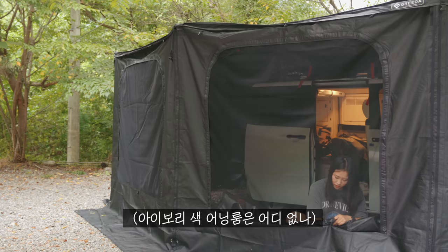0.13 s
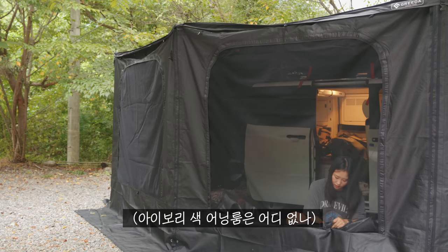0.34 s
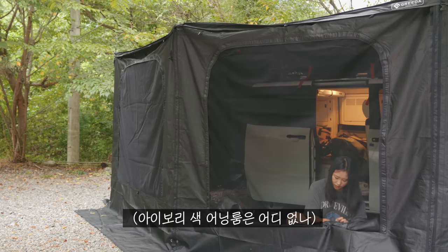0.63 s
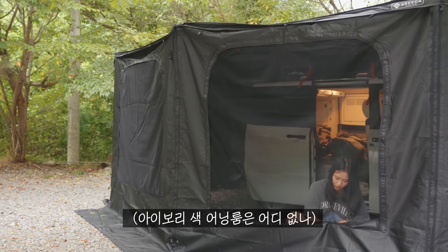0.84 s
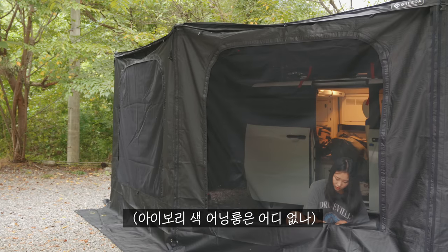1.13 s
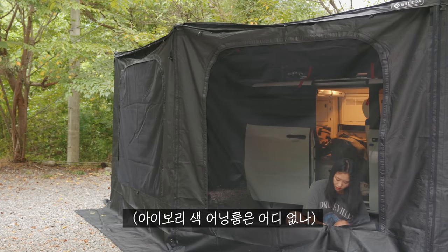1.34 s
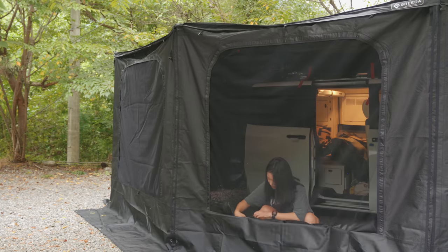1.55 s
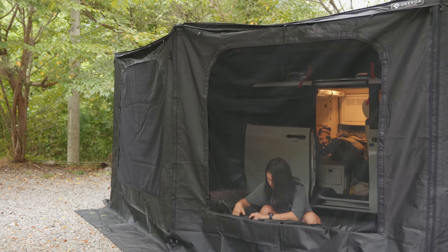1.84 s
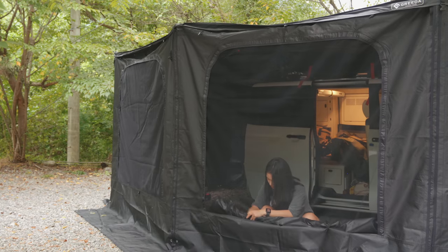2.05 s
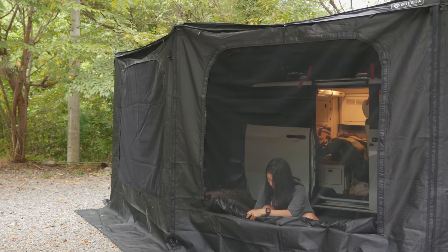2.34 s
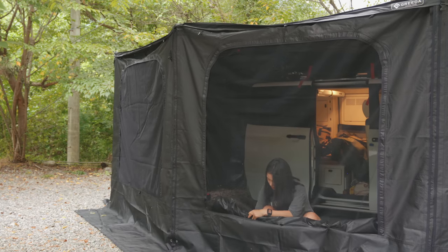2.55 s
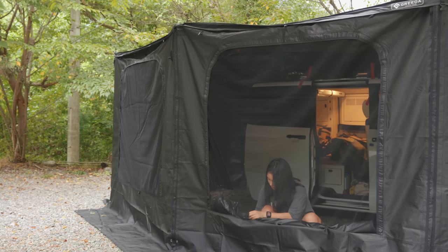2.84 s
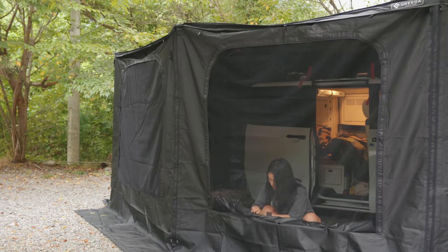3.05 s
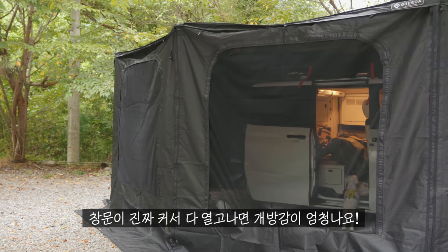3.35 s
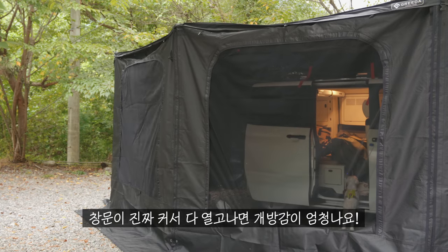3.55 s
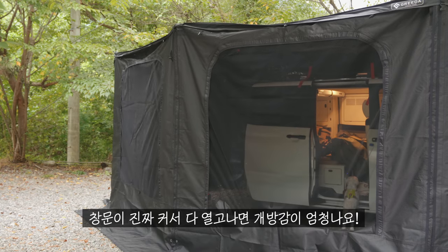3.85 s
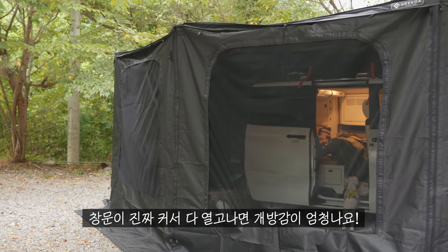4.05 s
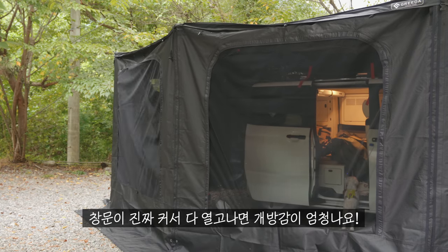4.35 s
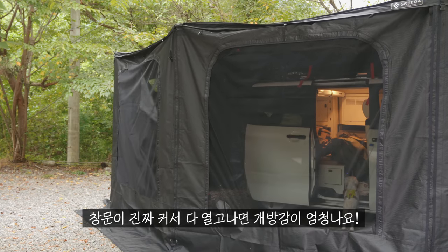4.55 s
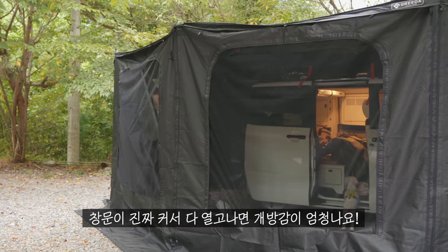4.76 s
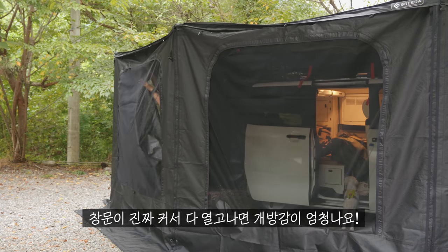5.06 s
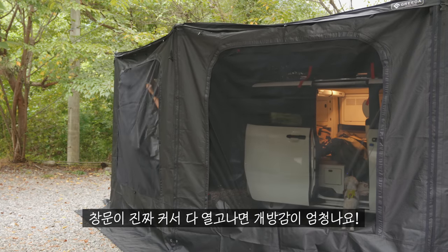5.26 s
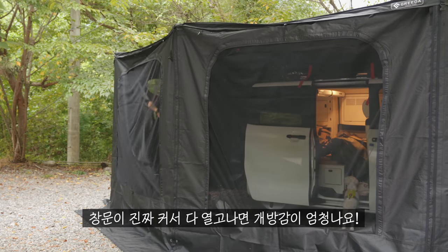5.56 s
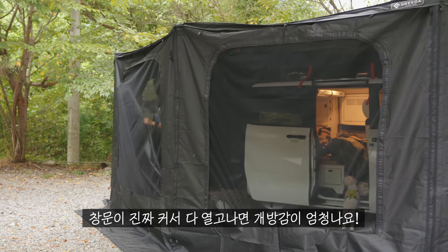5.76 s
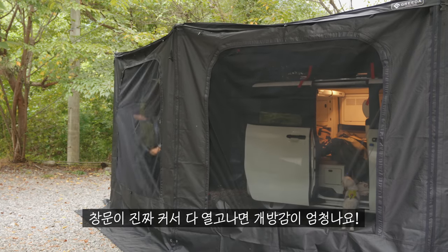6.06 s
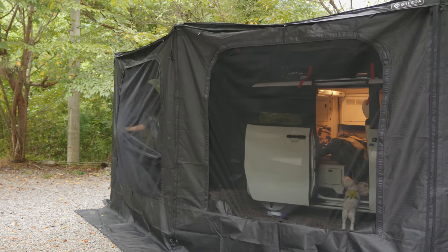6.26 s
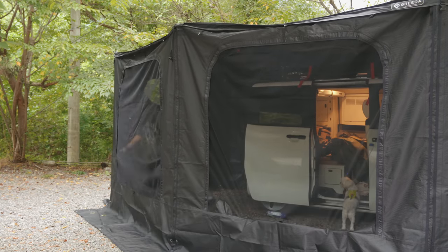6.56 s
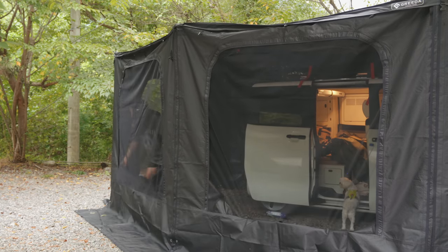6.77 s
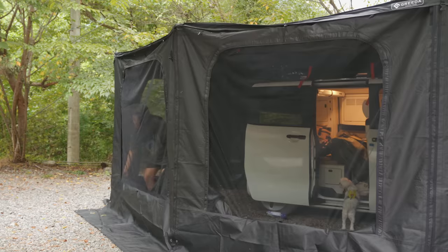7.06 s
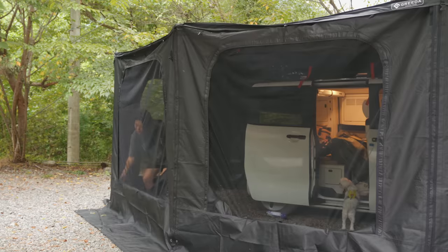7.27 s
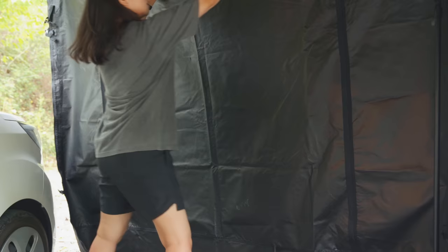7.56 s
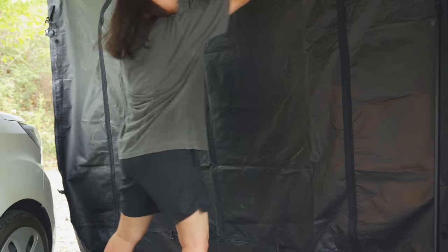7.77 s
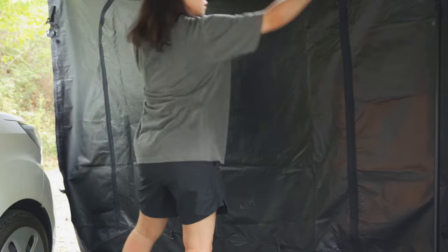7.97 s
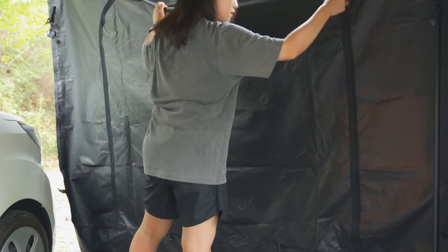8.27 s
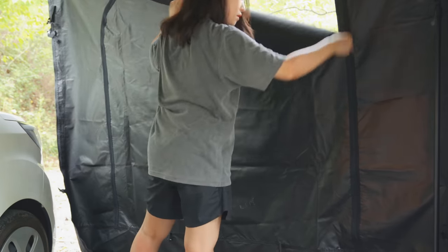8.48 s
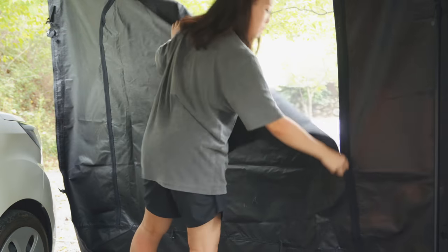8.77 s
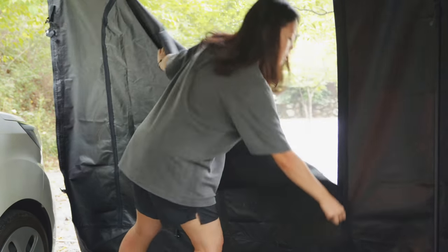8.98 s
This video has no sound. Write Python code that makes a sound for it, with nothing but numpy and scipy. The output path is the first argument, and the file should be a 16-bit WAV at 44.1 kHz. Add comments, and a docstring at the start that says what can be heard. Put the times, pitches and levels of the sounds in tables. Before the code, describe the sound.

A steady, shimmering high insect chorus fills the open air of a wood, with rapid whistled cricket trills and a low hush beneath. From 0 to 0.9 s tent cloth flaps in small hollow pops and rustles; a cicada chirps in even pulses until about 2.4 s. Crisp fabric grabs come at 1.6 to 2 s and again near 2.8 s. At 3.4 s a zip some metres away buzzes and rasps until 4.5 s, rising and falling in pitch, while the cicada draws out a thin buzz to 5.6 s. Cloth pops at 4.7 s. A longer, uneven zip run lasts from 5.2 to 7.1 s, with faint tab jingles and rustling. At 7.6 s the perspective jumps close: a louder, coarser zip slows near 8.3 s, races high around 8.6 s, then eases until 9.1 s, with bright tab ringing and hissing nylon; crickets are fainter, background hiss fuller.

```python
"""Beside a nylon tent in a wood: zips on its window panels are pulled open, two runs some metres away,
then one close by. The slider ticks over the teeth at the speed of the hand: the panel hums at the tooth rate,
noise rasps with each tooth, single high overtones stand out as thin rising tones and the metal tab rings in
two modes. Cloth rustles as filtered noise and flaps in hollow pops; tree crickets trill in short whistles,
a cicada chirps and buzzes, and bands of noise make the insect chorus and the open air."""
import sys
import numpy as np
from scipy import signal
from scipy.fft import rfft, irfft, next_fast_len
from scipy.io import wavfile

SR = 44100
rng = np.random.default_rng(int(sys.argv[2]) if len(sys.argv) > 2 else 0)


def wav_out(sig):
    """Save sig, one row per channel (or a flat mono array), as 16-bit PCM at SR to the path in sys.argv[1]."""
    wavfile.write(sys.argv[1], SR, np.round(np.clip(np.atleast_2d(sig).T, -1, 1) * 32767).astype(np.int16))


N = 402633
T = np.arange(N) / SR
NEAR_S = 7.603  # the listening point moves up to the tent here


def undb(db):
    """Decibels to gain."""
    return 10 ** (np.asarray(db) / 20)


def unit(x):
    """Scale to rms 1."""
    return x / np.sqrt(np.mean(x ** 2) + 1e-18)


def noise():
    """White noise."""
    return rng.standard_normal(N)


def filtered(x, gain_at):
    """Apply a gain that is a function of frequency."""
    size = next_fast_len(len(x), True)
    hz = np.fft.rfftfreq(size, 1 / SR) + 1e-6  # keeps the logarithm finite
    return irfft(rfft(x, size) * gain_at(hz), size)[:len(x)]


def colour(x, points):
    """Filter x along a curve of (f/Hz, level/dB) points, with a steep step down beyond both ends."""
    hz, db = np.transpose(points)

    def gain_at(f):
        return undb(np.interp(np.log(f), np.log(hz), db, left=db[0] - 32, right=db[-1] - 39))

    return filtered(x, gain_at)


def resonance(x, hz, width_hz):
    """One ringing mode, gain 1 at its centre."""
    return signal.lfilter(*signal.iirpeak(hz, hz / width_hz, fs=SR), x)


def double_resonance(x, hz, width_hz):
    """The same mode twice in a row, for steeper skirts."""
    return resonance(resonance(x, hz, width_hz), hz, width_hz)


def band(x, edges):
    """The part of x between two frequencies."""
    return filtered(x, lambda f: (f > edges[0]) & (f < edges[1]))


def walk(rate):
    """Smooth chance with spread 1 that changes about rate times a second."""
    return unit(filtered(noise(), lambda f: np.exp(-np.minimum(f / rate, 20) ** 2)))


def envelope(times, db, fade_s=0.005):
    """Gain along a dB curve, fading to silence just beyond both ends."""
    inside = np.clip(np.minimum(T - times[0], times[-1] - T) / fade_s + 2, 0, 1)
    return undb(np.interp(T, times, db)) * inside


def swells(rows):
    """Gain of rounded bursts (centre t/s, half-length/s, level/dB)."""
    gain = np.zeros(N)
    for centre, length, db in rows:
        span = slice(*np.searchsorted(T, [centre - 2 * length, centre + 2 * length]))
        gain[span] += undb(db) * np.exp(-2 * ((T[span] - centre) / length) ** 2)
    return gain


def tent(x, t60_s, wet_db):
    """Direct sound plus a short scatter from the cloth walls and the ground."""
    t = T[:SR // 4]
    tail = rng.standard_normal(len(t)) * undb(-60 * t / t60_s) * (t > .001)
    response = undb(wet_db) * tail / np.linalg.norm(tail)
    response[0] = 1
    return signal.fftconvolve(x, response / np.linalg.norm(response))[:N]


def zipper(run, rasp_colour, thrum_db, overtone_db, rasp_db, build_s, unsteady, tooth_db, falloff,
           patchy_db=3, count=6):
    """Each tooth kicks the panel and makes the rasp flare; the hand never pulls quite evenly."""
    # how the buzzing panel radiates its overtones: f/Hz, relative level/dB
    panel_colour = [(200, 0), (1200, 0), (1800, 1), (2400, -3), (2900, 1), (3400, -2), (4150, 7),
                    (6000, -2), (12000, -12)]
    first_tug_db = -4  # rasp and overtones start soft and build as the pull takes hold
    usual_teeth_hz, rasp_db_per_octave = 600, 4.5  # the faster the slider, the louder the rasp
    slow_knock_db_per_octave = 0.5  # a slow slider knocks more than it hums: weaker thrum, stronger overtones

    s, hz, panel_db = np.transpose(run)
    slack = np.exp(-np.maximum(T - s[0], 0) / build_s) if build_s > 0 else 0
    rasp_lift, overtone_lift = np.array(slider_ease()) * undb(first_tug_db * slack)

    speed = np.interp(T, s, hz)
    # a slow slider sticks and slips more than a fast one
    rate = speed * (1 + unsteady * np.sqrt(600 / speed) * (walk(35) + walk(250)))
    teeth = np.cumsum(rate) / SR
    tooth_index = np.abs(teeth).astype(int)
    size = undb(tooth_db * noise())[tooth_index]
    # each tooth catches a little early or late
    phase = 2 * np.pi * teeth + .22 * walk(220)

    # the cloth thrums once a tooth; overtones come and go as its tension shifts
    thrum = unit(np.sin(phase) * undb(3.2 * walk(52)) * size)
    overtones = sum(np.sin(k * phase) * undb(patchy_db * walk(25)) / k ** falloff for k in range(2, count + 1))
    overtones = unit(colour(overtones * size, panel_colour))
    octaves = np.log2(speed / usual_teeth_hz)
    knock = undb(-slow_knock_db_per_octave * octaves)
    buzz = thrum * undb(thrum_db) / knock
    buzz += overtones * overtone_lift * undb(overtone_db) * knock
    buzz *= envelope(s, panel_db)
    # light cloth radiates hardly any bass
    buzz = signal.sosfilt(signal.butter(2, 110, "high", fs=SR, output="sos"), buzz)

    tooth_flare = 0.84 + np.exp(-(teeth % 1) / 0.19)
    scrape = noise() * size * tooth_flare * undb(1.63 * walk(18))
    rasp = colour(scrape, rasp_colour)
    rasp /= np.std(band(rasp, (2300, 4400)))  # the rasp level refers to this band
    rasp *= undb(rasp_db + rasp_db_per_octave * octaves)
    return tent(buzz, 0.081, -4.5) + rasp * rasp_lift * running(run)


def slider_ease():
    """Gains of rasp and overtones, which swell or drop as the slider binds or runs more easily."""
    # moments when the slider binds or runs more easily:
    # centre t/s, half-length/s, rasp change/dB, overtone change/dB
    ease_rows = [(4.15, 0.17, 0, -6), (5.476, 0.11, -1, 4.5), (5.779, 0.29, 5.5, 9.5), (7.615, 0.067, 4, 1),
                 (7.977, 0.083, 2, 8.5), (8.46, 0.046, 0.5, 10.5), (9.08, 0.18, -3, 7.5)]
    at, length, rasp_db, overtone_db = np.transpose(ease_rows)
    weight = np.exp(-2 * ((T[:, None] - at) / length) ** 2)
    return undb(weight @ rasp_db), undb(weight @ overtone_db)


def running(run):
    """1 while the slider moves, else 0, with short fades."""
    return envelope((run[0][0], run[-1][0]), (0, 0))


def rising_overtones(rough=0.0084):
    """Single high overtones of the tooth rate stand out as thin tones that rise and level off."""
    # thin rising tones: start t/s, end t/s, start f/Hz, end f/Hz, level at the middle/dB
    tone_rows = [(3.516, 3.728, 1764, 2110, -38.5), (6.779, 7.006, 2005, 2300, -38.5),
                 (6.872, 7.094, 1636, 1770, -40.5)]
    out = np.zeros(N)
    for start, end, from_hz, to_hz, db in tone_rows:
        progress = np.clip((T - start) / (end - start), 0, 1)
        glide = to_hz + (from_hz - to_hz) * (1 - progress) ** 2
        pitch = glide * (1 + rough * walk(280))
        loudness = undb(db + 2 * walk(60)) * np.sin(np.pi * progress)
        out += loudness * np.sin(2 * np.pi * np.cumsum(pitch) / SR)
    return out


def pull_tab(modes_hz, low_db, width_hz):
    """The shaken metal tab rattles on the slider and rings in two modes."""
    rattle = noise() * undb(3.5 * walk(68))
    low, high = (unit(double_resonance(rattle, hz, width_hz)) for hz in modes_hz)
    return undb(low_db) * low + high


def nylon_slide(drag_db):
    """The fine weave hisses as one layer drags over another, louder at each slip."""
    # spectrum of the hiss: f/Hz, relative level/dB
    hiss_colour = [(2000, -23), (6000, -4), (11000, -7), (13000, -4.5), (14500, 4.5), (15700, -3.5)]
    # nylon slips over nylon as the near panel peels away: centre t/s, half-length/s, level/dB
    slip_rows = [(8.15, 0.18, -30.5), (8.63, 0.2, -26), (9.02, 0.11, -33)]
    hiss = colour(noise() * undb(1.67 * walk(80)), hiss_colour)
    hiss /= np.std(band(hiss, (14300, 15700)))  # levels refer to this band
    return hiss * (undb(drag_db) + swells(slip_rows))


def rustle(db, crinkle_db, billow_hz=170, crackle_hz=2300):
    """Creases give way in dense, uneven little bursts; the whole panel moves with a soft low flutter."""
    # spectrum of the rustling cloth: f/Hz, relative level/dB
    cloth_colour = [(60, -9), (150, -3.5), (400, 2), (700, -1.5), (1200, 1), (1800, -10.5), (3000, -14.5),
                    (6000, -11), (15000, -29)]
    # the loosened panel billows: centre t/s, half-length/s, level/dB
    billow_rows = [(.75, 0.12, -72), (1.93, 0.046, -59), (3.2, .15, -60), (5.23, 0.018, -57.5),
                   (5.95, 0.033, -48), (6.45, 0.29, -48.5), (7.07, 0.092, -49), (8.15, 0.12, -42)]
    rustling, crackling = handling()
    creases = noise() * undb(crinkle_db * walk(34) + 0.86 * walk(520))
    cloth = unit(tent(colour(creases, cloth_colour), 0.12, -13))
    crackle = unit(double_resonance(creases, crackle_hz, crackle_hz))
    flutter = unit(double_resonance(creases, billow_hz, billow_hz))
    return cloth * rustling * undb(db) + crackle * crackling + flutter * swells(billow_rows)


def handling():
    """Gains of rustle and crackle: each grab of the cloth rises quickly, holds and dies away."""
    # the cloth is gathered or folded: start t/s, length/s, relative rustle level/dB, crackle level/dB
    grab_rows = [(0.35, 0.53, -48, -64), (1.568, 0.15, -43, -53.5), (1.795, 0.16, -41.5, -53.5),
                 (2.74, 0.54, -47, -56), (4.547, 0.35, -46.5, -58), (6.944, 0.567, -45.5, -64)]
    grab_s, let_go_s = 0.02, 0.039  # rise time and decay constant of each grab
    stir_db = -54.5  # the cloth never lies quite still
    start, length, level_db, crackle_db = np.transpose(grab_rows)
    since = T[:, None] - start
    rise = np.clip(since / grab_s + .5, 0, 1)
    fall = np.exp(-np.maximum(since - length, 0) / let_go_s)
    grabs = rise * fall
    return grabs @ undb(level_db) + undb(stir_db), grabs @ undb(crackle_db)


def flaps(db, ring_s, decay_s, crisp_db, crumple_db):
    """A fold snaps taut: a short hollow pop, then a crumple with a crisp edge."""
    # snapping folds: start t/s, relative level/dB, centre f/Hz, relative edge level/dB
    flap_rows = [(0.079, -34, 805, -10), (0.216, -28, 974, -18), (0.38, -26, 891, -13),
                 (0.42, -32, 1100, -20), (0.672, -29, 850, -14), (0.704, -36, 1100, -2),
                 (0.771, -26, 1160, -28), (0.874, -24, 724, -26), (1.592, -31, 999, -14),
                 (1.634, -22, 972, -4), (2.058, -30, 1060, -18), (2.826, -32, 982, -8),
                 (4.7, -28, 781, -20), (4.773, -29, 800, -18), (4.882, -30, 1500, -16)]
    out, t = np.zeros(N), T[:SR // 6]
    for s, peak_db, hz, edge_db in flap_rows:
        crackle = rng.standard_normal(len(t)) * np.exp(-t / decay_s)
        pop = np.sin(2 * np.pi * hz * t) * t / ring_s * np.exp(1 - t / ring_s)
        crumple = double_resonance(crackle, hz, hz)
        edge = resonance(crackle * np.exp(-t / decay_s), 2800, 3400)
        flap = pop + undb(crumple_db) * crumple / np.abs(crumple).max()
        flap += undb(edge_db + crisp_db) * edge / np.abs(edge).max()
        start = int(s * SR)
        out[start:start + len(t)] += undb(peak_db + db) * flap
    return tent(out, .09, -10)


def crickets(sweep=0.0726, waver=0.0058):
    """Each wing stroke is a short whistle that sags in pitch; the leaves scatter a little into the gaps."""
    # tree crickets: f/Hz, wing strokes per second/Hz, relative level/dB, stroke width/cycles
    cricket_rows = [(6650, 29.0, -41.5, .085), (6740, 28.3, -50, .14), (8830, 29.4, -49, .1)]
    out = 0
    for hz, strokes, db, width in cricket_rows:
        cycle = np.cumsum(strokes * (1 + 0.019 * walk(7))) / SR % 1 - .5
        pitch = hz * (1 - sweep * cycle + waver * walk(269))
        stroke = np.exp(-.5 * (cycle / width) ** 2)
        loudness = (stroke + .12) * undb(2 * walk(20))
        out = out + undb(db) * unit(loudness * np.sin(2 * np.pi * np.cumsum(pitch) / SR))
    return out


def cicada(body_hz=5080, width_hz=600, buzz_db=-1):
    """Noise for dense tymbal clicks rings the body in chirps; wavering tones make the drawn-out buzz."""
    # partials of the buzz: f/Hz, relative level/dB
    buzz_partials = [(4544, -63), (4926, -54), (5110, -58), (5319, -54), (5674, -56)]
    # even bouts of chirps: start t/s, end t/s, level/dB
    bout_rows = [(.07, .3, -47), (.705, 2.4, -45), (3.17, 3.4, -47)]
    chirp_s, period_s = .045, .162  # half-length of a chirp, time from one to the next
    clicks = noise() * undb(1 * walk(300))
    beats = [(s, chirp_s, db) for start, end, db in bout_rows for s in np.arange(start, end, period_s)]
    chirps = unit(double_resonance(clicks, body_hz, width_hz)) * swells(beats)
    clock = np.cumsum(1 + 0.00296 * walk(98)) / SR  # all partials waver in pitch together
    buzz = sum(undb(db) * unit(np.sin(2 * np.pi * hz * clock) * undb(3 * walk(25))) for hz, db in buzz_partials)
    return chirps + buzz * envelope((3.3, 5.6), (buzz_db, buzz_db))


def wood(chorus_db, air_db, near_db):
    """Countless far insects blur into a shimmering band over the low hush of the air."""
    # distant insect chorus: f/Hz, relative level/dB
    chorus_colour = [(3400, -21), (4100, -17), (4500, -16), (4950, -10), (5700, -14.5), (6250, -6),
                     (6600, 4), (6950, 0.5), (7450, -10), (8300, -5.5), (8850, -2), (9700, -17.5),
                     (11500, -15), (13700, -11), (15700, -13.5)]
    # further background once the microphone is at the tent: f/Hz, relative level/dB
    near_colour = [(30, -2), (80, -6), (200, -21), (2800, -4), (5000, 10), (6700, 10.5), (11000, -14),
                   (15700, -7)]
    # open air: f/Hz, relative level/dB
    air_colour = [(25, -23), (80, -2), (150, -8.5), (600, -8.5), (1000, -12.5), (2200, -15.5),
                  (3400, -15.5)]
    chorus = unit(colour(noise() * undb(0.81 * walk(100)), chorus_colour)) * undb(chorus_db + 0.21 * walk(1))
    air = unit(colour(noise(), air_colour)) * undb(air_db + walk(0.67))
    close = unit(colour(noise(), near_colour)) * undb(near_db)
    return chorus + air + close * (T > NEAR_S)


def scene():
    """The zips, the cloth and the wood around, heard from some metres off and then close to the tent."""
    # three runs of a zip: t/s, teeth per second f/Hz, relative panel level/dB
    first_run = [(3.38, 496.8, -47), (3.46, 942.1, -38), (3.51, 764, -45), (3.67, 652, -35.5),
                 (3.754, 510.6, -43.5), (3.918, 468.2, -42.5), (4.146, 786, -34.5), (4.224, 762, -45),
                 (4.278, 564, -35), (4.356, 547.5, -40), (4.464, 379, -44), (4.5, 356.3, -56)]
    second_run = [(5.16, 388.3, -47), (5.23, 494.5, -36.5), (5.296, 764, -41.5), (5.394, 1092, -42.5),
                  (5.628, 570, -39.5), (5.678, 437.3, -41.5), (5.76, 790, -46), (5.874, 919.4, -40),
                  (6.098, 701.4, -40.5), (6.136, 770.6, -37), (6.284, 591, -36.5), (6.344, 470, -37.5),
                  (6.404, 680.7, -40), (6.486, 803, -40.5), (6.688, 512, -40.5), (6.742, 571.8, -43),
                  (6.906, 481.4, -40.5), (7.12, 186, -60)]
    near_run = [(7.61, 495, -38.5), (7.668, 444.4, -43), (7.736, 669, -38.5), (7.824, 617, -36),
                (7.884, 735.5, -40.5), (7.994, 795, -32), (8.036, 663, -27.5), (8.07, 427.3, -32),
                (8.112, 346.7, -28.5), (8.184, 215.6, -32), (8.304, 124.0, -38), (8.41, 484.3, -32),
                (8.448, 618, -33.5), (8.592, 1318, -31), (8.684, 1415, -27), (8.874, 651.4, -36.5),
                (9.066, 611.3, -40.5), (9.13, 549, -34)]
    # how the rasping teeth radiate, at a distance and close by: f/Hz, relative level/dB
    far_rasp = [(100, -49), (400, 7), (1500, 7), (2600, 7), (4000, 1), (7000, 5), (10000, -1), (15500, -4)]
    near_rasp = [(80, -10), (400, -0.5), (1300, 2), (2500, 1), (6500, -2), (10000, -2), (15500, -4.5)]
    # the pull tab jingles now and then: centre t/s, half-length/s, level of its high mode/dB
    jingle_rows = [(4.44, 0.086, -41), (5.87, 0.088, -36.5), (6.16, 0.14, -41), (6.7, 0.1, -37.5),
                   (7.04, 0.12, -36), (8.04, 0.089, -27), (8.26, 0.08, -26.5), (8.42, 0.094, -28),
                   (8.68, 0.16, -41)]
    near = T > NEAR_S

    zips = zipper(first_run, far_rasp, thrum_db=2.5, overtone_db=1.0, rasp_db=-45.5, build_s=0.1,
                  unsteady=.036, tooth_db=0.5, falloff=1.57, patchy_db=4)
    zips += zipper(second_run, far_rasp, thrum_db=4.0, overtone_db=2.0, rasp_db=-45, build_s=0.27,
                   unsteady=.04, tooth_db=2, falloff=1.8, patchy_db=2.5)
    zips += near * zipper(near_run, near_rasp, thrum_db=5, overtone_db=1.5, rasp_db=-35.5, build_s=0,
                          unsteady=.036, tooth_db=1.5, falloff=1.0, patchy_db=4.0)
    zips += rising_overtones()

    far_tab = pull_tab((5640, 13440), low_db=-10, width_hz=220)
    near_tab = pull_tab((5760, 13850), low_db=-8, width_hz=120)
    # the tab rattles while the slider runs
    shaking = undb(-49) * (running(first_run) + running(second_run)) + undb(-37) * running(near_run)
    tab = np.where(near, near_tab, far_tab) * np.maximum(shaking, swells(jingle_rows))

    cloth = rustle(db=-1.5, crinkle_db=2.5) + near * nylon_slide(drag_db=-52)
    cloth += flaps(db=-3, ring_s=.0012, decay_s=.006, crisp_db=4, crumple_db=-2)
    insects = crickets() * np.where(near, .4, 1) + cicada()  # the crickets are fainter close to the tent
    background = wood(chorus_db=-36, air_db=-52.5, near_db=-33.5)
    return (zips + tab + cloth + insects + background)[None]


def record(dry):
    """The recorder cuts the top steeply above 15750 Hz."""
    return signal.sosfilt(signal.ellip(12, .2, 80, 15750, fs=SR, output="sos"), dry)


dry = scene()
out = record(dry)
wav_out(out)
```